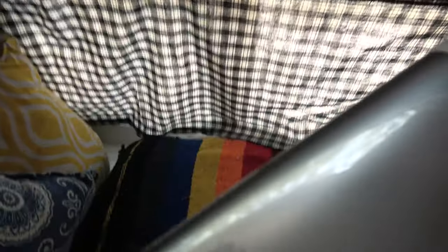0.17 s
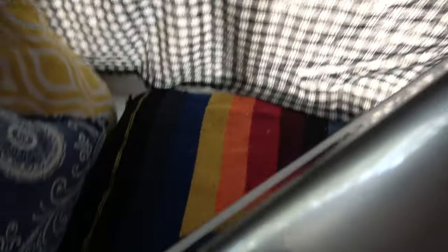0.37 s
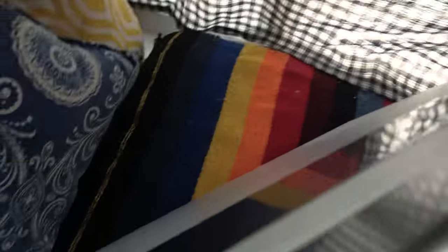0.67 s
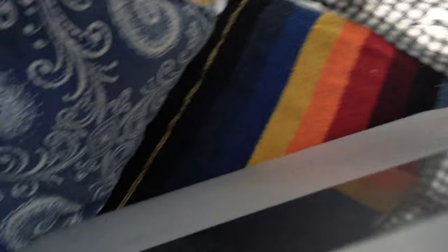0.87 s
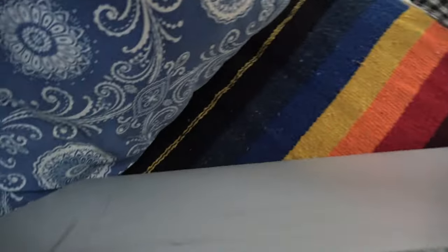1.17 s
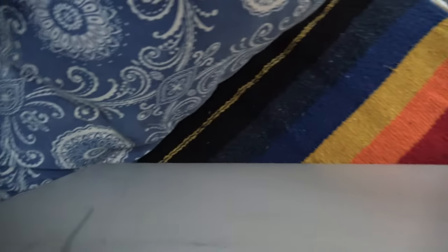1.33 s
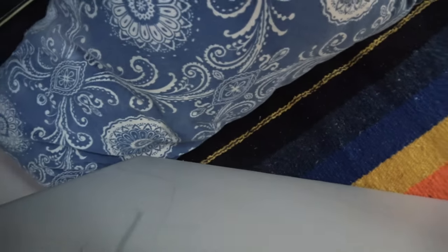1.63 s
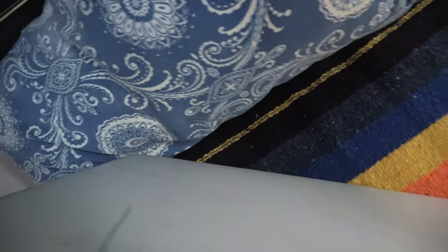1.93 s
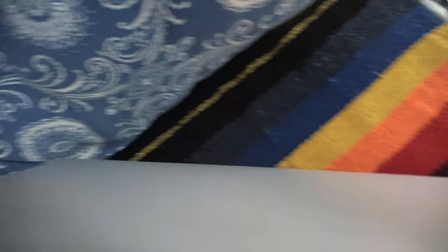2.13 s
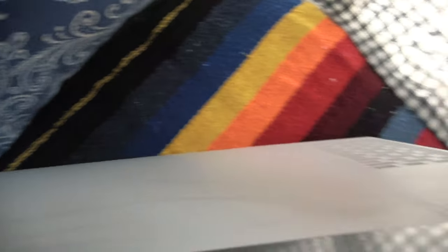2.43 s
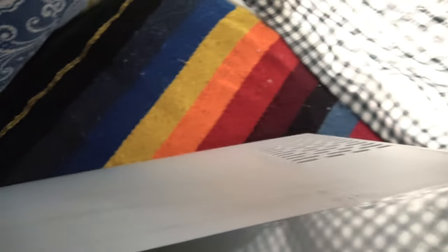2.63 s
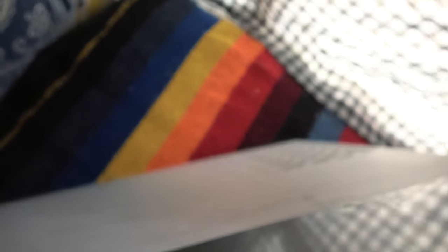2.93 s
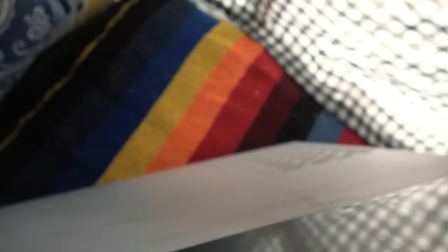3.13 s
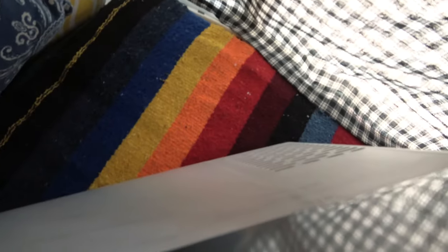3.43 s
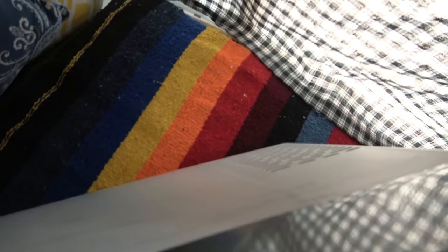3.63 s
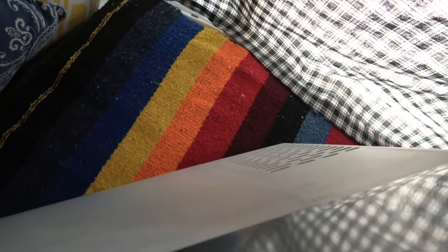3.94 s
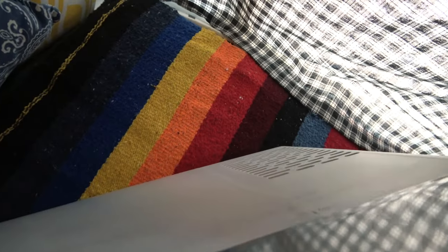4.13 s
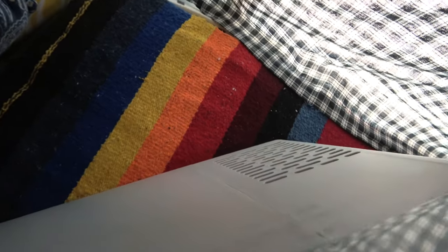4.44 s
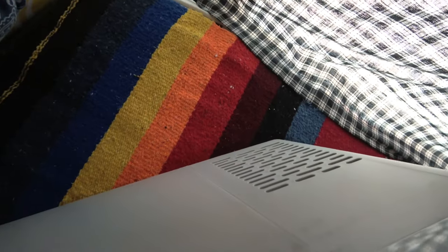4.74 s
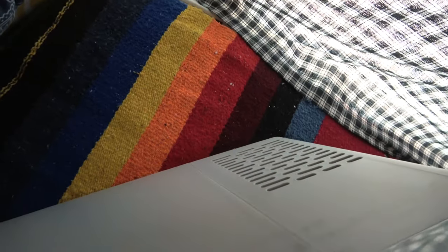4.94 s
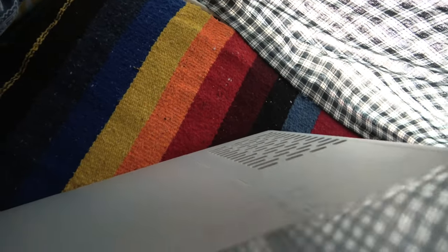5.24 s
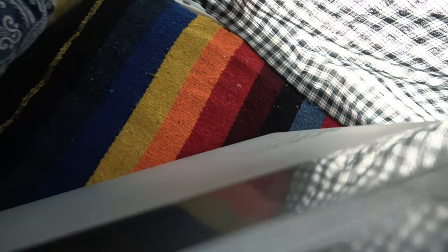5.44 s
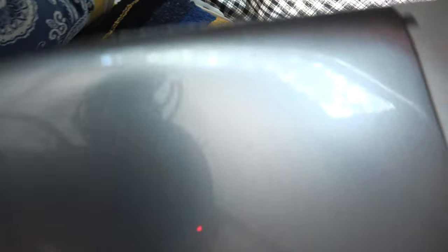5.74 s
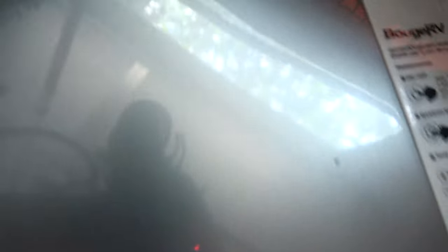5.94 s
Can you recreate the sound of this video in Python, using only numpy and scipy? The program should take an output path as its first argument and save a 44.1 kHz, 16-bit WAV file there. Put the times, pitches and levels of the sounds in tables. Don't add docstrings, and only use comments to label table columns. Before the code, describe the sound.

Very close, single-channel handheld sound of a portable fridge in a small, dry, cloth-lined vehicle interior. A continuous low electric hum carries rapid metallic ticking, hiss and faint hollow whistling tones. After a small early tap come loud, boomy, rattling knocks against plastic. The hollow colour fades, the hum and rush of air become stronger, and brief crisp rustles close it.

```python
import sys
import numpy as np
from scipy import signal
from scipy.io import wavfile

SR = 44100
rng = np.random.default_rng(int(sys.argv[2]) if len(sys.argv) > 2 else 0)


def log_audio(samples):
    frames = np.atleast_2d(samples).T
    limited = np.clip(frames, -1, 1)
    pcm = np.round(limited * 32767).astype(np.int16)
    wavfile.write(sys.argv[1], SR, pcm)


def gain_from_db(level_db):
    decades = np.asarray(level_db, float) / 20
    return 10 ** decades


N = 268745


def in_time(rows):
    s, *columns = np.transpose(rows)
    return [np.interp(np.arange(N) / SR, s, c) for c in columns]


def rms_one(x):
    return x / np.sqrt(np.mean(x ** 2) + 1e-20)


def band(x, low_hz, high_hz, order=2):
    sos = signal.butter(order, [low_hz, min(high_hz, .45 * SR)], "band", fs=SR, output="sos")
    return signal.sosfilt(sos, x)


def drift(rate_hz):
    hop = 40
    r = np.exp(-2 * hop * np.pi * rate_hz / SR)
    slow = signal.lfilter([1], [1, -2 * r, r * r], rng.standard_normal(N // hop + 2002))[2000:]
    return np.interp(np.arange(N) / hop, np.arange(len(slow)), rms_one(slow - slow.mean()))


def resonate(x, modes):
    out = 0
    for k, (hz, width_hz, level_db) in enumerate(modes):
        r = np.exp(-np.pi * width_hz / SR)
        zeros = np.array([1, 0, -1]) * (1 - r * r) / 2
        poles = [1, -2 * r * np.cos(2 * np.pi * hz / SR), r * r]
        out = out + (-1) ** k * gain_from_db(level_db) * signal.lfilter(zeros, poles, x)
    return out


def tone(turns, level_db):
    return np.sqrt(2) * gain_from_db(level_db) * np.cos(2 * np.pi * turns)


def hump(start_s, length_s):
    return np.sin(np.pi * np.clip((np.arange(N) / SR - start_s) / length_s, 0, 1))


def far_side():
    swing_s = 0.52
    return np.clip(1 - np.arange(N) / SR / swing_s, 0, 1)


# multiple, level_db re the stroke tone
STROKE_HARMONICS = [(3, -26), (4, -22.5), (7, -36.5), (8, -39.5), (25, -39)]
# pitch_hz, width_hz, level_db
SHELL_MODES = [(1260, 90, -5), (2690, 30, -3), (3280, 40, -3), (3580, 35, 1), (3350, 300, -10),
               (3860, 130, 1), (4200, 200, -9), (4450, 80, -3), (4728, 30, -8), (7970, 100, -19)]


def compressor(first_db, hiss_db):
    stroke_hz = 49.75
    turns = stroke_hz * np.arange(N) / SR - .16
    second_db = first_db - 2.5 - 7 * far_side()
    hum = tone(turns, first_db) + tone(2 * turns + .11, second_db)
    for order, level_db in STROKE_HARMONICS:
        hum += tone(order * turns + rng.random(), first_db + level_db + 2.4 * drift(6.6))

    wobble = .0025 * drift(0.43)
    ticks = np.diff(np.floor(turns + wobble), prepend=-1)
    ticks = ticks * gain_from_db(1.0 * rng.standard_normal(N))
    ticks = ticks + .35 * np.roll(ticks, round(.0071 * SR))

    shell = 0
    for k, mode in enumerate(SHELL_MODES):
        swell = gain_from_db(2.5 * drift(.5))
        shell = shell + (-1) ** k * swell * resonate(ticks + 1e-18, [mode])
    return hum + gain_from_db(hiss_db - 8) * rms_one(shell)


# multiple, level_db re the fan tone
FAN_HARMONICS = [(3, -27), (4, -32), (5, -37), (6, -36), (12, -39)]


def fan(base_db):
    t = np.arange(N) / SR
    slow_hz, fast_hz, speeds_up_s = 92.51, 92.85, 3.35
    fan_turns = np.cumsum(np.where(t < speeds_up_s, slow_hz, fast_hz)) / SR
    swell_s, first_swell_s, swell_floor = 1.652, 0.59, .25
    swell = np.cos(np.pi * (t - first_swell_s) / swell_s) ** 2 + swell_floor ** 2
    quiet_s, quiet_width_s, quiet_db = 3.95, 0.63, -9
    quiet_spot_db = quiet_db * np.exp(-((t - quiet_s) / quiet_width_s) ** 2)
    fan_db = base_db - 1.5 + 10 * np.log10(swell) + quiet_spot_db
    out = tone(fan_turns + .47, fan_db)

    grille_turns = 2 * fan_turns + 1.1 * t
    grille_db = base_db - 16.5 - 17 * far_side() + 2.8 * drift(0.65)
    out += tone(grille_turns + .65, grille_db)

    panel_hz, node_s, node_to_crest_s = 128.9, 2.1, 2.87
    panel_turns = panel_hz * t
    standing = np.sin(np.pi / 2 * (t - node_s) / node_to_crest_s)
    out += standing * tone(panel_turns - .3, base_db - 7)

    blade_hz = 92.78
    for order, level_db in FAN_HARMONICS:
        out += tone(order * blade_hz * t + rng.random(), fan_db + level_db + 2.5 * drift(1.5))
    return out + tone(1.981 * panel_turns + .15 * drift(3), base_db - 24 + 2 * drift(3))


# pitch_hz, level_db (per Hz)
AIR_SPECTRUM = [(36, 29), (76, 22.5), (112, 29), (165, 21), (225, 10.5), (320, 3), (570, 0.5), (1290, -1.5),
                (2400, -12), (3700, -6), (4400, -12), (5100, -15.5), (9000, -26.5), (15500, -31)]


def air(rush_db, hiss_db, patchy_db):
    out, together = 0, drift(3)
    edges = 25 * 2 ** np.arange(0, 9.5, 1 / 3)
    white = rng.standard_normal((2, N))
    colour_hz, colour_db = np.transpose(AIR_SPECTRUM)
    for k, (low, high) in enumerate(zip(edges, edges[1:])):
        hz = np.sqrt(low * high)
        bright = np.clip(np.log2(hz / 1200), 0, 1)
        level_db = np.interp(np.log(hz), np.log(colour_hz), colour_db) - bright * 4
        level_db = level_db + (1 - bright) * rush_db + bright * (hiss_db + 8.0)
        level_db = level_db + patchy_db * (.4 * together + drift(5))
        out = out + gain_from_db(level_db + 11.5) * band(white[k % 2], low, high, order=3)
    return out


# pitch_hz, width_hz, level_db re the hiss, until_s
HOLLOW_TONES = [(474, 15, -24, 2.9), (840, 67, -9.5, 2.3), (2050, 270, -9.5, 0.89), (3650, 22, -16, 3.7),
                (4440, 34, -14.5, 4.6), (4090, 400, -14, 6.0), (8050, 60, -24.5, 1.9)]


def whistles(hiss_db):
    out = 0
    for hz, width_hz, level_db, until_s in HOLLOW_TONES:
        mode = [(hz, width_hz, 0)]
        narrow = resonate(resonate(rng.standard_normal(N), mode), mode)
        fade_db = -25 * np.clip(np.arange(N) / SR - until_s, 0, 1)
        out = out + gain_from_db(hiss_db + level_db + fade_db + 0.64 * drift(0.65)) * rms_one(narrow)
    return out


# start_s, length_s, bright_db, dull_db
CLOTH_RUSTLES = [(0.056, 0.14, -60.5, -54.5), (.17, 0.27, -66.5, -63), (0.377, .22, -68, -67),
                 (1.08, .29, -66, -75), (3.72, 0.37, -78, -57.5), (5.25, 0.67, -67, -71),
                 (5.372, .025, -62, -70), (5.41, .05, -64, -68), (5.56, .03, -65, -70),
                 (5.655, .035, -60, -68), (5.69, 0.067, -60, -64), (5.79, 0.095, -59, -49.5),
                 (5.902, 0.39, -68, -56)]
# start_s, length_s, level_db above the tremble
HAND_MOVES = [
    (0.315, 0.79, 12.5),
    (1.553, 0.33, 4.5),
    (4.253, 0.7, 7),
    (5.698, 0.32, 8),
]


def hand():
    tremble_db = -30.5 + 3.5 * drift(5.0)
    for start_s, length_s, level_db in HAND_MOVES:
        tremble_db = tremble_db + level_db * hump(start_s, length_s) ** .5
    tremble = gain_from_db(tremble_db) * rms_one(band(rng.standard_normal(N), 8.13, 18.5, order=4))

    grains = rng.standard_normal((2, N)) * gain_from_db(1.5 * drift(60))
    bright_level, dull_level = 0, 0
    for start_s, length_s, bright_db, dull_db in CLOTH_RUSTLES:
        stroke = hump(start_s, length_s)
        bright_level = bright_level + gain_from_db(bright_db) * stroke
        dull_level = dull_level + gain_from_db(dull_db) * stroke
    bright = bright_level * rms_one(band(grains[0], 9000, 14500))
    dull = dull_level * rms_one(band(grains[1], 3200, 7100))
    return tremble + bright + dull


# start_s, level_db (peak), pitch_hz, glide_hz_per_s, length_s
PANEL_PINGS = [(.741, -41, 4050, 0, .018), (.8, -43, 4050, 0, .014), (.825, -45, 4050, 0, .014),
               (3.435, -50, 4150, 0, .02), (3.772, -55, 7700, 0, .012), (3.855, -57, 7600, 0, .01),
               (4.9, -46, 3950, 0, .025), (6.018, -62, 11500, 30000, .06), (.374, -38, 5700, 0, .005),
               (.374, -38, 1450, 0, .005), (.983, -33, 880, 0, .011), (.983, -36, 1800, 0, .007),
               (2.016, -24, 950, 0, .022), (1.641, -30, 1020, 0, .016)]


def pings():
    out = np.zeros(N)
    for start_s, level_db, hz, glide, length_s in PANEL_PINGS:
        t = np.arange(round(length_s * SR)) / SR
        shape = np.minimum(t / 0.00075, 1) * np.cos(np.pi * t / length_s / 2)
        at = round(start_s * SR)
        out[at:at + len(t)] += gain_from_db(level_db) * shape * np.sin(2 * np.pi * (hz * t + glide * t ** 2 / 2))
    return out


# start_s, body_db, crack_db, edge_db, t60_s
CONTACTS = [(0.375, -29.5, -26, -40, 0.018), (.939, -52, -38, -49, .012), (0.982, -29, -35, -50, 0.017),
            (1.637, -26.5, -39, -68, 0.11), (1.681, -37.5, -27, -52, 0.093), (1.778, -17.5, -22, -42, 0.04),
            (1.791, -40.5, -38, -53.5, 0.17), (1.816, -28, -40, -62, 0.14), (1.838, -44, -44, -69, 0.04),
            (1.903, -35, -47, -72, 0.099), (1.93, -28, -38.5, -66, 0.18), (1.949, -37, -46, -63, 0.12),
            (1.996, -42, -44, -70, 0.13), (2.014, -20, -22.5, -37, 0.097), (2.033, -29, -36, -71, 0.16),
            (2.069, -41, -39, -64, 0.12), (2.099, -37, -47, -68, 0.031), (2.329, -39, -49, -75, 0.051)]
# pitch_hz, width_hz, level_db
BODY_MODES = [(322, 24.4, 7), (540, 160, -3), (867, 200, -1), (980, 164, -1), (1400, 670, -12)]
CLACK_MODES = [(1880, 950, -2), (2050, 180, 9), (2330, 350, 3.5)]
CRACK_MODES = [(3120, 470, -11.5), (3310, 970, 12), (3690, 210, 12.5), (3820, 96, 13), (4120, 190, -16.5)]


def knocks():
    excite = np.zeros((4, N))
    rattle = rng.standard_normal((4, N)) * gain_from_db(1.5 * drift(160))
    rattle *= gain_from_db(2.93 * rng.exponential(1, N) + 7.5)
    t = np.arange(SR // 3) / SR
    for start_s, body_db, crack_db, edge_db, t60_s in CONTACTS:
        clack_db = (body_db + crack_db) / 2 - 5.0
        levels = gain_from_db(np.array([body_db, clack_db, crack_db, edge_db]))
        at = round(start_s * SR)
        burst = rattle[:, at:at + len(t)] * gain_from_db(1.5 - 60 * t / t60_s) * np.minimum(t / .0005, 1)
        burst[:3, 4] += 11.0
        excite[:, at:at + len(t)] += levels[:, None] * burst

    colours = [lambda x: band(resonate(x, BODY_MODES), 200, 2500),
               lambda x: band(resonate(x, CLACK_MODES), 1400, 3000),
               lambda x: band(resonate(x, CRACK_MODES), 2600, 5200, order=3),
               lambda x: band(x, 4600, 11000)]
    out = 0
    for x, colour in zip(excite, colours):
        out = out + colour(x + 1e-18) / np.std(colour(rattle[0]))
    return out


# start_s, level_db (peak), pitch_hz, t60_s
WALL_THUMPS = [(0.584, -27.5, 295, 0.046), (0.731, -22.5, 226, 0.045), (1.642, -11, 169, 0.22),
               (1.662, -1.5, 92, 0.087), (1.706, -6.5, 73, 0.068), (1.776, 5, 86.5, 0.07),
               (1.778, -18.5, 462, 0.095), (1.641, -19, 281, 0.15), (2.019, -19.5, 358, 0.068),
               (2.071, -21, 340, 0.088), (1.79, -8.5, 233.3, 0.15), (1.823, -6.5, 238, 0.26),
               (1.814, -17, 136, 0.22), (1.84, -10.5, 79, 0.26), (1.859, -4, 227, 0.028),
               (1.921, -10, 221, 0.21), (1.945, -6, 153.5, 0.25), (1.969, -3, 148, 0.083),
               (2.001, -1.5, 88.5, 0.093), (2.029, -1.5, 69.5, 0.071), (2.034, -7.5, 225, 0.078),
               (2.059, -9.5, 75.7, 0.27), (2.111, -12.5, 201, 0.1)]


def thumps():
    out, t = np.zeros(N), np.arange(SR // 3) / SR
    for start_s, level_db, hz, t60_s in WALL_THUMPS:
        at = round(start_s * SR)
        swing = np.sin(2 * np.pi * hz * t * (1 - 0.403 * t)) * np.minimum(t * hz / 0.65, 1)
        out[at:at + len(t)] += gain_from_db(level_db - 60 * t / t60_s) * swing
    return out


# time_s, stroke_db, rush_db
LEVELS = [
    (0.0, -30.5, -49.5),
    (0.9, -27, -47.5),
    (1.4, -24.5, -47),
    (2.4, -24, -47.5),
    (3.3, -23.5, -45.5),
    (4.2, -20.5, -43.5),
    (4.9, -18.5, -41.8),
    (6.09, -21, -40.5),
]
# start_s, length_s, rush_db, hiss_db
CABINET_DRAG = (1.863, 0.36, 8.0, 1.2)


def scene():
    base_db, rush_db = in_time(LEVELS)
    start_s, length_s, drag_rush_db, drag_hiss_db = CABINET_DRAG
    drag = hump(start_s, length_s)
    hiss_db = -49.5 + 0.84 * (rush_db + 46) + drag_hiss_db * drag
    rush_db = rush_db + drag_rush_db * drag
    fridge = compressor(base_db, hiss_db) + fan(base_db)
    fridge = fridge + air(rush_db, hiss_db, patchy_db=0.79) + whistles(hiss_db)
    return (fridge + hand() + pings() + knocks() + thumps())[None]


def top_cut(x):
    return signal.sosfilt(signal.butter(12, 16450, fs=SR, output="sos"), x)


def record(dry):
    rounded = 1.2 * np.tanh(dry / 1.2)
    low_pass = signal.ellip(14, .3, 75, 15700, fs=SR, output="sos")
    cut = signal.sosfilt(low_pass, rounded)
    fade = np.sin(np.pi / 2 * np.clip(np.arange(N)[::-1] / (.003 * SR), 0, 1)) ** 2
    return top_cut(cut * fade)


dry = scene()
out = record(dry)
log_audio(out)
```